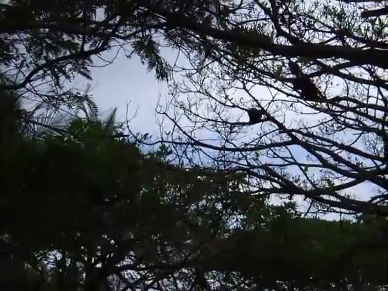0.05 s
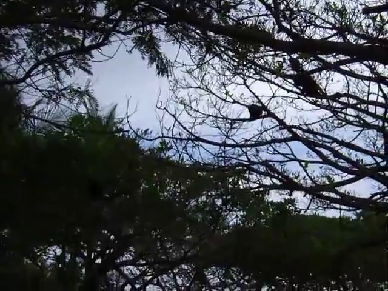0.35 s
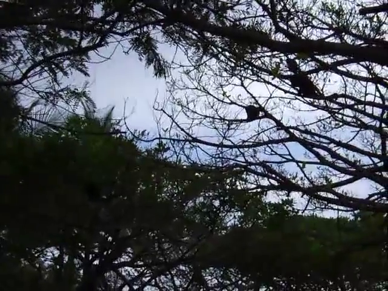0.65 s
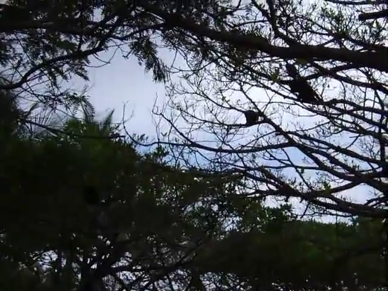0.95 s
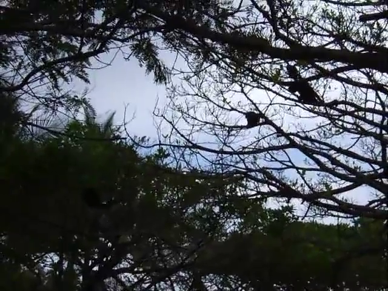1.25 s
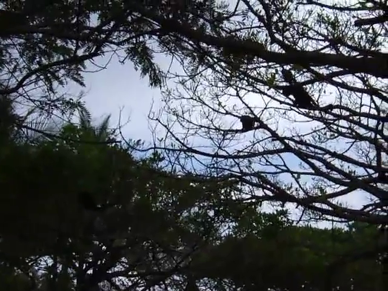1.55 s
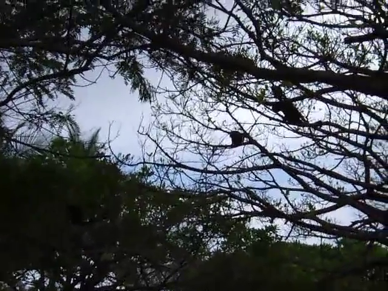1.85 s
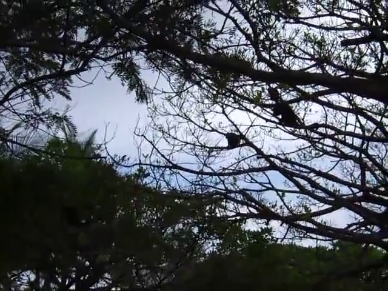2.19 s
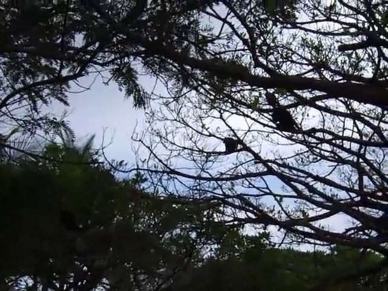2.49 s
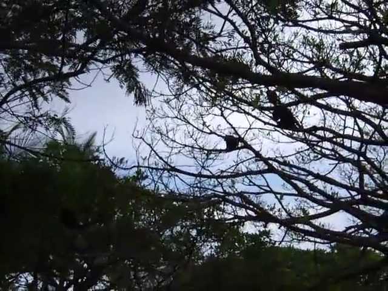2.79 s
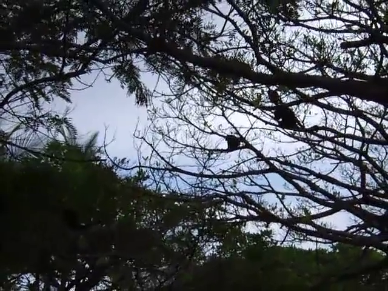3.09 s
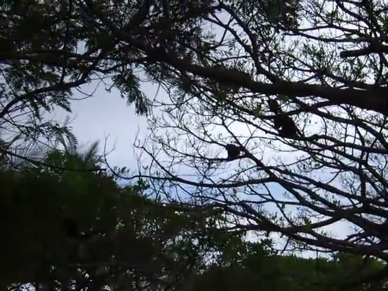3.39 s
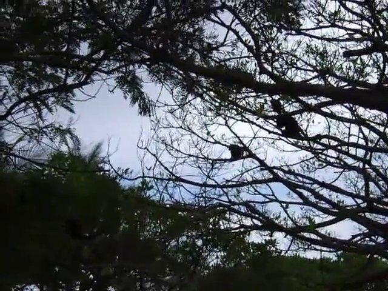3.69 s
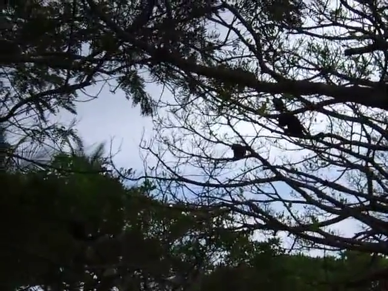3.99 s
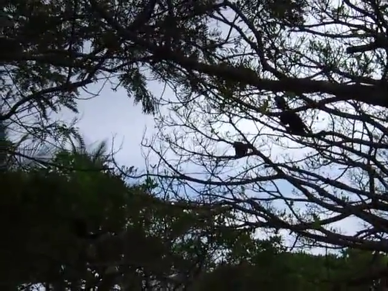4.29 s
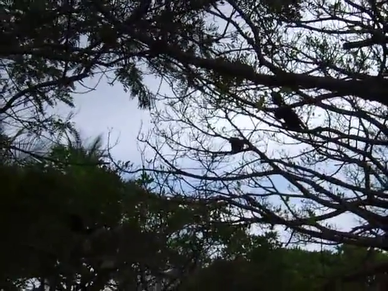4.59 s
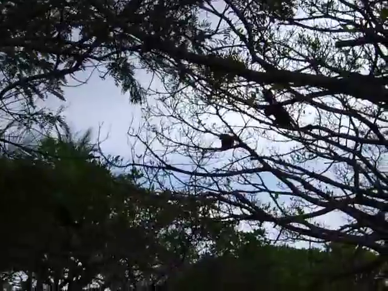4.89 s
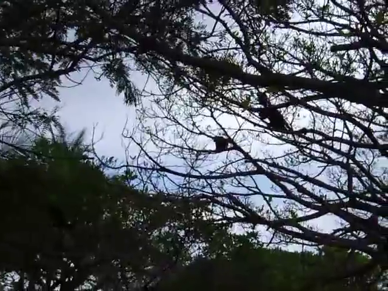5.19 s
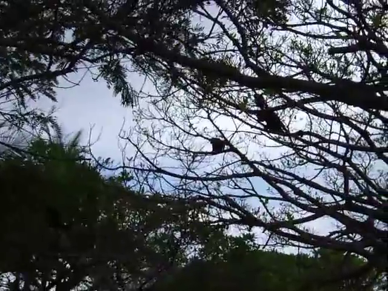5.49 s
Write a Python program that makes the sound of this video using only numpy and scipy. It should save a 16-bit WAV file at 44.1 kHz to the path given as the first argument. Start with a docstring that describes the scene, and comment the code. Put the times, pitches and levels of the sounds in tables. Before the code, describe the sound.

A howler monkey calls from a tree in a forest, each call a short, hoarse hoot with a throaty rattle, a breathy rasp and a faint echo. Three calls come at the very start, at 0.4 and at 0.9 seconds. Four louder ones follow at about 1.3, 1.6, 2.0 and 2.6 seconds. The fourth call carries a thin, high squeak, and brief airy whistles at the lips touch the louder calls. After a pause, one last clipped call comes at 4.7 seconds. Underneath, until the end at about 5.6 seconds, run a steady hush of trees, a low uneven wind rumble, a faint far roar that swells slightly near the end, and a very thin high electronic whine. Soft handling bumps on the microphone fall between 2.4 and 3.1 seconds and again at 4.8, with one small dry click at 3.2 seconds.

```python
"""Eight short, hoarse howler monkey calls from a tree, with a faint forest echo.
Two vocal oscillators and a chaotic rattle ring throat sac, throat and mouth; air whistles at the lips.
Underneath: hush of trees, wind rumble, far roar, and a hand-held camera's bumps, click and thin whine."""
import sys
import numpy as np
from scipy import signal
from scipy.fft import rfft, irfft
from scipy.io import wavfile
from scipy.ndimage import uniform_filter1d

SR = 44100
rng = np.random.default_rng(int(sys.argv[2]) if len(sys.argv) > 2 else 0)


def wav_out(sig):
    """Save sig, one row per channel (or a flat mono array), as 16-bit PCM at SR to the path in sys.argv[1]."""
    wavfile.write(sys.argv[1], SR, np.round(np.clip(np.atleast_2d(sig).T, -1, 1) * 32767).astype(np.int16))


N = 249165
TIME_S = np.arange(N) / SR

# noise spectra of trees, wind, far roar, vocal rattle: f/Hz, relative density/dB
HUSH_SPECTRUM = [(12, -41), (20, -2), (60, -9), (145, -5), (177, -7), (212, -7), (361, -9.5), (489, -12),
                 (570, -12.5), (716, -6.5), (922, -9.5), (4920, -22.5), (7390, -21.5), (7970, -25),
                 (8600, -39), (11200, -52.5), (18900, -120)]
RUMBLE_SPECTRUM = [(15, 3.5), (45, 2), (100, 1), (200, -5.5), (400, -23), (1500, -67)]
ROAR_SPECTRUM = [(200, -24), (500, -11), (750, -8.5), (950, -0.5), (1150, -1.5), (1400, -21), (2200, -21),
                 (5000, -37)]
RATTLE_SPECTRUM = [(200, 2.5), (280, -9.5), (340, 4.5), (420, 0.5), (510, 4), (620, 5), (760, 11.5),
                   (880, 2), (1200, -6)]
# gain on air and camera, dips as the loud calls begin: t/s, gain/dB
BACKGROUND_GAIN = [(0, 1.45), (1.33, 1.7), (1.38, -1.5), (2.8, -1.5), (4, 0), (4.8, 1.5), (5.65, 1.25)]
# air, before that gain: t/s, rumble level/dB, roar level/dB
AIR_LEVELS = [(0, -54.5, -53.5), (.8, -62, -54.5), (1.6, -48, -47.5), (2.3, -46, -48), (2.8, -46.5, -54),
              (3.1, -49, -47), (3.4, -47, -54), (4.1, -52.5, -51.5), (4.7, -51, -52.5), (5.0, -53.5, -48.5),
              (5.4, -46, -45.5), (5.65, -52, -50)]
# electronic tones, before that gain: f/Hz, level/dB
WHINE_TONES = [(7859, -61), (8141, -65)]
# hand bumps, before that gain: t/s, level/dB, f/Hz, decay/s
HAND_BUMPS = [(2.387, -29.5, 61.3, 0.0074), (2.486, -36, 68.5, 0.0081), (2.559, -31.5, 53.6, 0.0091),
              (3.017, -31, 55.16, 0.0089), (3.129, -23.5, 154, 0.0027), (3.129, -32, 55.4, 0.007),
              (4.832, -36.5, 65.4, 0.0069)]
# echoes from trunks and forest edge: delay/s, gain/dB
TRUNK_ECHOES = [(.021, -16.5), (.047, -23), (0.127, -28), (0.179, -27.5)]
# leaf scatter: f/Hz, T60/s
LEAF_DECAY = [(200, 0.15), (750, 0.75), (2500, 0.63), (8000, 0.19)]
# squeak in call 4: t/s, f/Hz, level/dB
SQUEAK_CURVE = [(1.305, 5230, -57), (1.345, 5200, -44), (1.36, 5075, -28.5), (1.378, 5040, -55.5),
                (1.42, 5238, -61)]
# lips parting or closing: t/s, f/Hz, level/dB, decay/s
LIP_WHISTLES = [(1.306, 5750, -38, 0.045), (1.306, 4580, -42, .035), (1.61, 6350, -44, .035),
                (1.746, 2283, -39.5, 0.11), (1.76, 6440, -48, 0.12), (2.215, 2307, -39.5, 0.049),
                (2.63, 5260, -32.5, 0.031), (2.632, 3375, -50.5, 0.09), (4.723, 5830, -39.5, 0.027)]
# voice pitch, one list per call: t/s, f/Hz
PITCH_CURVES = [
    [(0.0, 346.4), (0.018, 356.5), (0.13, 350.4)],
    [(0.41, 384.8), (0.44, 385.5), (0.464, 329.5), (0.494, 327), (0.512, 358), (0.64, 343.7)],
    [(0.9, 393), (0.956, 405.7), (1.0, 361.3), (1.046, 363.1), (1.062, 347.2), (1.15, 357)],
    [(1.31, 382.0), (1.348, 363.4), (1.406, 390.7), (1.48, 359.3), (1.518, 356), (1.53, 353)],
    [(1.61, 362.6), (1.682, 361.2), (1.704, 399), (1.75, 394.7), (1.774, 371.8), (1.83, 385.4)],
    [(2.06, 389.6), (2.144, 369.2), (2.174, 400.5), (2.206, 372.3), (2.322, 397), (2.36, 394.2)],
    [(2.61, 406), (2.64, 419.2), (2.73, 368), (2.82, 363.5), (2.83, 378.7), (2.87, 388)],
    [(4.73, 365.3), (4.746, 384.7), (4.756, 384.8), (4.772, 358.7), (4.796, 344.5), (4.82, 350.3)],
]
# sac resonances at half-open jaw: f/Hz, width/Hz, relative gain/dB
SAC_MODES = [(396.7, 201, 17), (268.6, 330, -6.5)]
# lower throat resonances, jaw up to half open: f/Hz, width/Hz, gain/dB re main resonance
LOW_THROAT_MODES = [(680, 50, -7.5), (526, 82, 1)]
# back, whistle, front, lip resonances: width/Hz, glide/(1/s), effort slope/(dB/dB), dulling share
MOUTH_MODES = [(254, -.1, 1.9, 1), (75, 0.34, 1.1, .5), (400, -0.24, 1.4, 0.33), (244, -.2, 1.5, 0.8)]
# upper lip resonances: share above the lowest at spread 1, width/Hz, relative gain/dB
UPPER_LIP_MODES = [(.08, 322, 2), (0.201, 700, -5)]
# one row per call; columns and units as unpacked, levels before effort and dulling
# ROUGH: rattle's weight in the drive; SPLIT: lower oscillator's share of tonal power
CALLS = [ (-.07, 0.047, 0.12, .055, -7, 9, 12.5, 0.3, 0.11, 0.7, 0.7, -27.5, -28, -46, -49, -54, -48, 664, 0.47, 1310, 2230, 3780, 5370, 1.2),
         (.398, 0.074, 0.077, .11, -12, 2.5, 3.5, .25, 0.01, 0.7, 0.77, -23.5, -24.5, -43, -40.5, -45.5, -39.5, 757.7, -0.024, 1400, 2060, 3550, 5530, 0.82),
         (.893, 0.059, 0.11, 0.1, -10.5, 3.5, 2, 0.22, 0.04, 0.32, .85, -24.5, -24.5, -47.5, -42, -46.5, -42.5, 706, -0.73, 1410, 2074, 3577, 5473, 1),
         (1.307, 0.05, .11, .066, -10, -0.5, 26, 0.28, 0.02, 0, 0, -18, -18, -34, -52, -51.5, -37.5, 750, -0.14, 1217, 2356, 4170, 5093, 0.65),
         (1.601, .036, .112, .205, -12.5, 8, 8, 0.31, .07, 0, 0.31, -17.5, -17.5, -36, -44, -47.5, -42, 761.7, -.1, 1252, 2144, 3755, 5290, 1.1),
         (2.042, 0.039, .175, .115, -17, 6.5, 8.5, 0.37, 0.1, 0.03, 0.6, -18.5, -20, -39, -43.5, -49.5, -42, 754.5, -.15, 1206, 2233, 3750, 5200, 1.1),
         (2.598, .075, 0.12, 0.15, -15, 11, 10, 0.5, 0.27, 0.32, 0.94, -19.5, -21, -37, -48, -61.5, -37, 723, -0.26, 1097, 2354, 3347, 5210, 1.08),
         (4.711, .056, .02, 0.085, -12.5, 3.5, 6.5, .5, 0.06, 0, 0.32, -19.5, -22, -45, -59, -53, -34.5, 670, -1.74, 1380, 2293, 3450, 5318, 0.53)]
(START_S, RISE_S, HOLD_S, FALL_S, CATCH_DB, DROP_DB, DULL_DB,
 ROUGH_ATTACK, ROUGH_HELD, EARLY_SPLIT, LATE_SPLIT,
 SAC_DB, THROAT_DB, BACK_DB, WHISTLE_DB, FRONT_DB, LIPS_DB,
 THROAT_HZ, JAW_GLIDE_PER_S, BACK_HZ, WHISTLE_HZ, FRONT_HZ, LIPS_HZ, LIP_SPREAD) = np.transpose(CALLS)
CALL = np.maximum(np.searchsorted(START_S, TIME_S) - 1, 0)  # call index per sample
AGE_S = TIME_S - START_S[CALL]


def gain_of(db):
    """dB to amplitude."""
    return 10 ** (np.asarray(db) / 20)


def unit_rms(x):
    """Scale to rms 1."""
    return x / np.sqrt(np.mean(x ** 2) + 1e-20)


def steadied(x, samples):
    """Scale to running rms 1; fast flutter remains."""
    power = uniform_filter1d(uniform_filter1d(x ** 2, samples), samples // 2)
    return x / np.sqrt(abs(power) + 1e-14)


def at_hz(points, hz):
    """Interpolate over log frequency."""
    f, value = np.transpose(points)
    return np.interp(np.log(hz + 1), np.log(f + 1), value)


def follow(rows):
    """Interpolate each column over time."""
    times_s, *columns = np.transpose(rows)
    return [np.interp(TIME_S, times_s, column) for column in columns]


def add(mix, start_s, sound):
    """Mix in place."""
    part = mix[max(round(start_s * SR), 0):][:len(sound)]
    part += sound[:len(part)]


def colour(x, spectrum):
    """Filter by a spectrum; rms 1."""
    return unit_rms(irfft(rfft(x) * gain_of(at_hz(spectrum, np.fft.rfftfreq(N, 1 / SR))), N))


def noise(spectrum):
    """Coloured noise, rms 1."""
    return colour(rng.standard_normal(N), spectrum)


def wander(hz):
    """Low-passed random drift, rms 1."""
    lowpass = signal.butter(3, hz, fs=SR, output="sos")
    return unit_rms(signal.sosfilt(lowpass, rng.standard_normal(N + SR))[SR:])


def resonate(x, hz, width_hz):
    """Steep unity-gain resonance; the centre may move."""
    carrier = np.exp(2j * np.pi * np.cumsum(hz * np.ones(len(x))) / SR)
    r = np.exp(-np.pi * width_hz / SR)
    baseband = signal.lfilter([(1 - r) ** 2], [1, -2 * r, r * r], x / carrier + 1e-18)
    return 2 * (carrier * baseband).real


def air(hush_db=-43.5):
    """Hush of trees, lumpy wind at the microphone, a far roar swelling late."""
    rumble_db, roar_db = follow(AIR_LEVELS)
    hush = noise(HUSH_SPECTRUM) * gain_of(hush_db + 0.71 * wander(hz=7.4))
    rumble = noise(RUMBLE_SPECTRUM) * gain_of(rumble_db + 1.5 * wander(hz=20))
    roar = noise(ROAR_SPECTRUM) * gain_of(roar_db + 1.5 * wander(hz=7.2))
    return hush + rumble + roar


def whine(wobble_hz=30):
    """Camera electronics: two thin tones with a fast, regular waver."""
    wobble_rad = np.sin(2 * np.pi * wobble_hz * TIME_S)
    return sum(np.sqrt(2) * gain_of(db) * np.sin(2 * np.pi * (hz * TIME_S + rng.random()) + wobble_rad)
               for hz, db in WHINE_TONES)


def handling(click_s=3.2408, click_db=-24.5, click_decay_s=.0011):
    """Hand on the camera: soft bumps, one dry click of the housing."""
    out, t = np.zeros(N), TIME_S[:SR // 8]
    for start_s, db, hz, decay_s in HAND_BUMPS:
        envelope = t / decay_s * np.exp(1 - t / decay_s)
        add(out, start_s, gain_of(db) * envelope * np.sin(2 * np.pi * hz * t))
    crack = noise([(300, -19), (1300, -3), (2000, -2), (3200, 5), (7000, -3), (9000, -25), (12000, -43)])
    add(out, click_s, gain_of(click_db) * crack[:len(t)] * np.exp(-t / click_decay_s))
    return out


def forest(voice, scatter_db=-17, taps_per_s=1500):
    """Distinct echoes plus thin scatter from leaves."""
    taps = rng.standard_normal(SR) * (rng.random(SR) < taps_per_s / SR)
    hz, t, spectra = signal.stft(taps, SR, nperseg=256)
    decay = gain_of(-60 * t / at_hz(LEAF_DECAY, hz)[:, None])
    tail = signal.istft(spectra * decay, SR, nperseg=256)[1]
    response = gain_of(scatter_db) * tail / np.linalg.norm(tail)
    for delay_s, db in TRUNK_ECHOES:
        add(response, delay_s, gain_of([db]))
    return signal.fftconvolve(voice, response)[:N]


def squeak(waver_share=0.0046):
    """Air through narrowed lips: one wavering tone."""
    hz, db = follow(SQUEAK_CURVE)
    cycles = np.cumsum(hz * (1 + waver_share * wander(hz=100))) / SR
    gate = (TIME_S > SQUEAK_CURVE[0][0]) & (TIME_S < SQUEAK_CURVE[-1][0])
    return np.sqrt(2) * gain_of(db) * np.sin(2 * np.pi * cycles) * gate


def whistles(width_share=.025, attack_s=.003):
    """Turbulent air at the lips, one narrow resonance per burst."""
    out, t = np.zeros(N), TIME_S[:SR // 2]
    for start_s, hz, db, decay_s in LIP_WHISTLES:
        ring = steadied(resonate(rng.standard_normal(SR), hz, width_share * hz), 600)[-len(t):]
        envelope = np.minimum(t / attack_s, 1) * np.exp(-t / decay_s)
        add(out, start_s, gain_of(db) * envelope * ring)
    return out


def stages(break_share=0.2):
    """Progress, 0-1, through each call's rise, hold, fall and the voice break that opens the fall."""
    rise = np.clip(AGE_S / RISE_S[CALL], 0, 1)
    hold = np.clip((AGE_S - RISE_S[CALL]) / HOLD_S[CALL], 0, 1)
    fall = np.clip((AGE_S - (RISE_S + HOLD_S)[CALL]) / FALL_S[CALL], 0, 1)
    return rise, hold, fall, np.minimum(fall / break_share, 1)


def glide(hz, share_per_s):
    """Linear slide through each call's frequency at mid-hold."""
    past_middle_s = AGE_S - (RISE_S + HOLD_S / 2)[CALL]
    return hz[CALL] * (1 + share_per_s * np.minimum(past_middle_s, (HOLD_S / 2 + FALL_S)[CALL]))


def effort(catch_share=0.14, fade_db=-11.5, flutter_db=1.41):
    """Blowing effort/dB (catch, swell, hold, break, fade) and dulling/dB, growing over the hold."""
    rise, hold, fall, broken = stages()
    attack_db = CATCH_DB[CALL] * np.interp(rise, [catch_share, 1], [1, 0])
    release_db = fade_db * fall ** 2 - DROP_DB[CALL] * broken
    return attack_db + release_db + flutter_db * wander(hz=28), DULL_DB[CALL] * hold


def voicing(settle_s=.03, waver_share=0.00697, low_base_hz=276.4, climb_hz=65.43, sag_hz=37.97):
    """Rough start; the lower oscillator climbs and fades as the voice settles, returns at the break."""
    _, _, fall, broken = stages()
    settled = np.clip((AGE_S - RISE_S[CALL]) / settle_s, 0, 1)
    hz = follow(np.concatenate(PITCH_CURVES))[0] * (1 + waver_share * wander(hz=20))
    low_hz = low_base_hz + np.where(fall > 0, -sag_hz * fall, climb_hz * settled)
    split = EARLY_SPLIT[CALL] * (1 - settled ** 3) + LATE_SPLIT[CALL] * broken
    rough = ROUGH_ATTACK[CALL] * (1 - settled) + ROUGH_HELD[CALL] * (settled + 1.227 * broken)
    return hz, low_hz, np.clip(split, 0, 1), np.clip(rough, 0, 1)


def oscillator(hz, jitter):
    """Sharp vocal pulses with uneven periods, 20 harmonics."""
    cycles = np.cumsum(hz * (1 + jitter * wander(hz=117.3))) / SR
    return unit_rms(sum(np.cos(2 * np.pi * k * cycles) for k in range(1, 21)))


def rattle(slap_hz=125, rate_spread=.3, puff_cycles=0.36):
    """Loose tissue slaps unevenly; each slap passes a puff of air."""
    cycles = np.cumsum(slap_hz * (1 + rate_spread * wander(hz=80))) / SR
    return colour(np.exp(-(cycles % 1) / puff_cycles) * rng.standard_normal(N), RATTLE_SPECTRUM)


def larynx(rattle_db=4):
    """Two oscillators plus rattle: the throat's drive and a breathier one for the mouth."""
    hz, low_hz, split, rough = voicing()
    jitter = 0.0076 + 0.0439 * rough
    folds = np.sqrt(1 - split) * oscillator(hz, jitter) + np.sqrt(split) * oscillator(low_hz, jitter)
    puffs = rattle()
    drive = np.sqrt(1 - rough) * folds + np.sqrt(rough) * gain_of(rattle_db) * puffs
    return drive, drive + puffs + rng.standard_normal(N)


def rasp(breathy, effort_db, dull_db, gape_db=2):
    """Mouth and lip resonances speak when blown hard; the gape is widest at mid-hold."""
    widths_hz, glides_per_s, slopes, dull_shares = np.transpose(MOUTH_MODES)
    centres_hz = list(map(glide, (BACK_HZ, WHISTLE_HZ, FRONT_HZ, LIPS_HZ), glides_per_s))
    bands = [resonate(breathy, hz, width_hz) for hz, width_hz in zip(centres_hz, widths_hz)]
    for step, width_hz, db in UPPER_LIP_MODES:
        upper_hz = (1 + step * LIP_SPREAD[CALL]) * centres_hz[-1]
        bands[-1] += gain_of(db) * resonate(breathy, upper_hz, width_hz)
    _, hold, _, _ = stages()
    blow_db = effort_db + gape_db * (np.sin(np.pi * hold) - .5)
    levels_db = (BACK_DB, WHISTLE_DB, FRONT_DB, LIPS_DB)
    return sum(gain_of(db[CALL] + slope * blow_db - dull_share * dull_db) * steadied(band, 900)
               for band, db, slope, dull_share in zip(bands, levels_db, slopes, dull_shares))


def cavity(drive, modes):
    """Resonances at steady rms; alternating signs fill the valleys between them."""
    ringing = sum((-1) ** k * gain_of(db) * resonate(drive, hz, width_hz)
                  for k, (hz, width_hz, db) in enumerate(modes))
    return steadied(ringing, 1300)


def hoot(drive, effort_db, dull_db, band_hz=(215, 930), main_width_hz=105, half_open_hz=756):
    """Body of the call: the larynx rings sac and throat; sac and main resonance glide with the jaw."""
    dark = signal.sosfilt(signal.butter(4, band_hz, "band", fs=SR, output="sos"), drive)
    main_hz = glide(THROAT_HZ, JAW_GLIDE_PER_S[CALL])
    sac_ratio = (main_hz / half_open_hz) ** 0.35
    sac = cavity(dark, [(hz * sac_ratio, width_hz, db) for hz, width_hz, db in SAC_MODES])
    loss_db = 2 * np.maximum(main_hz - half_open_hz, 0)  # an open jaw weakens the lower modes
    low_modes = [(hz, width_hz, db - loss_db) for hz, width_hz, db in LOW_THROAT_MODES]
    throat = cavity(dark, [(main_hz, main_width_hz, 0), *low_modes])
    sac_db = SAC_DB[CALL] + effort_db - 0.12 * dull_db
    throat_db = THROAT_DB[CALL] + 0.86 * effort_db - 0.56 * dull_db
    return gain_of(sac_db) * sac + gain_of(throat_db) * throat


def monkey(edge_s=.004):
    """Hoot and rasp, gated per call, plus lip squeak and whistles."""
    drive, breathy = larynx()
    effort_db, dull_db = effort()
    remaining_s = (RISE_S + HOLD_S + FALL_S)[CALL] - AGE_S
    gate = np.clip(np.minimum(AGE_S, remaining_s) / edge_s, 0, 1)
    calls = hoot(drive, effort_db, dull_db) + rasp(breathy, effort_db, dull_db)
    return gate * calls + squeak() + whistles()


def scene():
    """Monkey and echo over air and camera sounds; mono."""
    voice = monkey()
    background = (air() + whine() + handling()) * gain_of(follow(BACKGROUND_GAIN)[0])
    return (background + forest(voice) + voice)[None]


def record(dry, cutoff_hz=8650):
    """The camera's steep low-pass."""
    lowpass = signal.firwin(255, cutoff_hz, window=("kaiser", 9), fs=SR)
    return signal.oaconvolve(dry, lowpass[None], "same")


dry = scene()
out = record(dry)
wav_out(out)
```